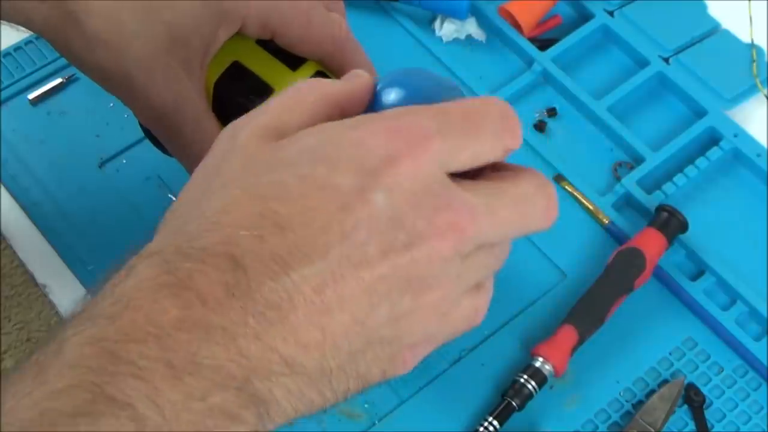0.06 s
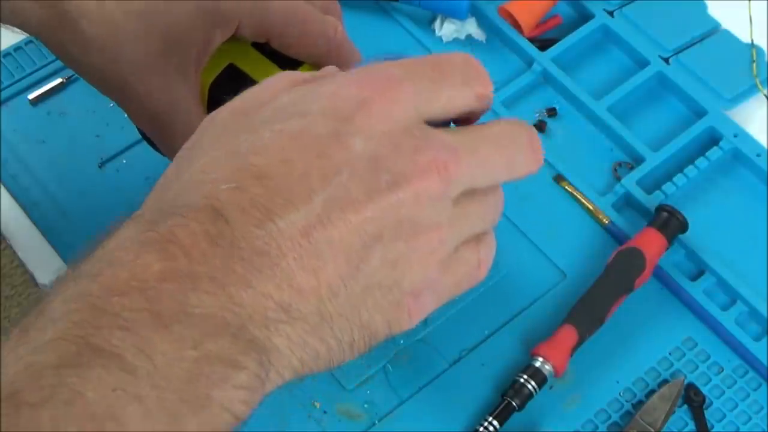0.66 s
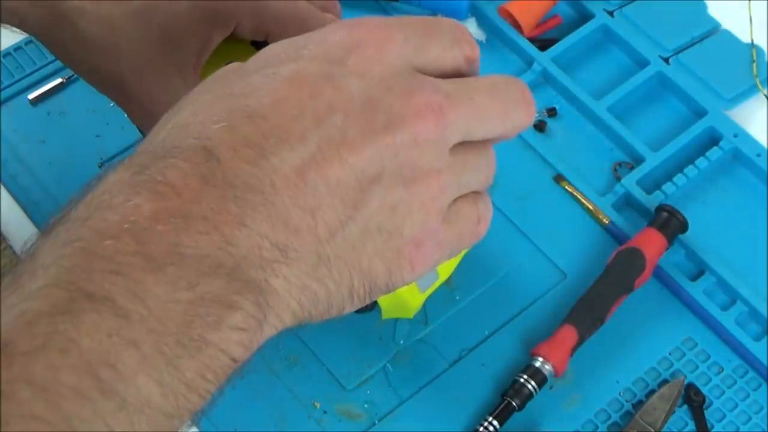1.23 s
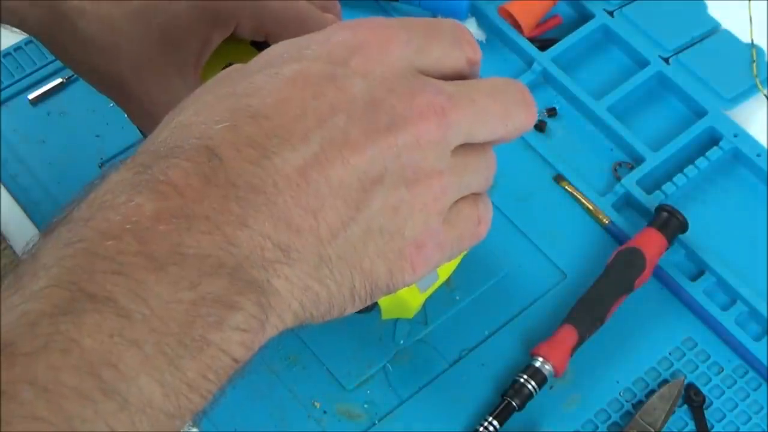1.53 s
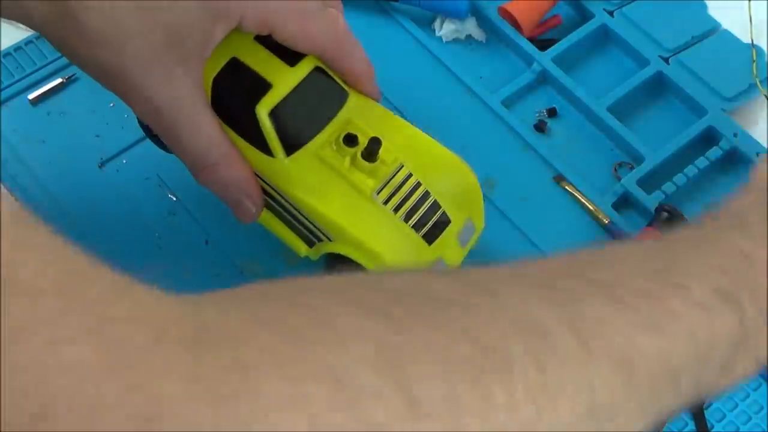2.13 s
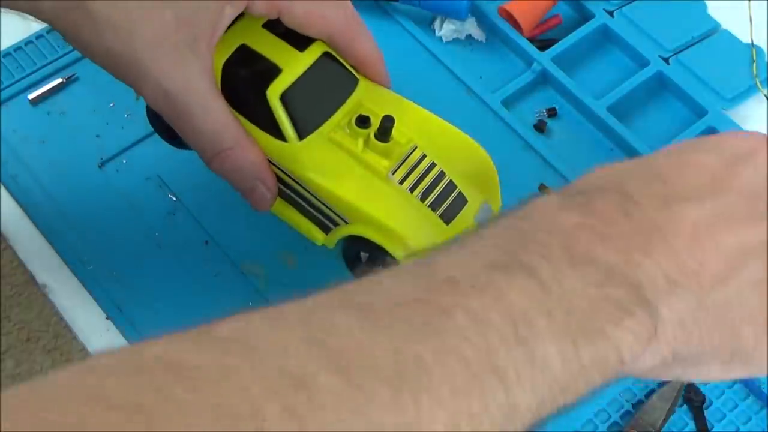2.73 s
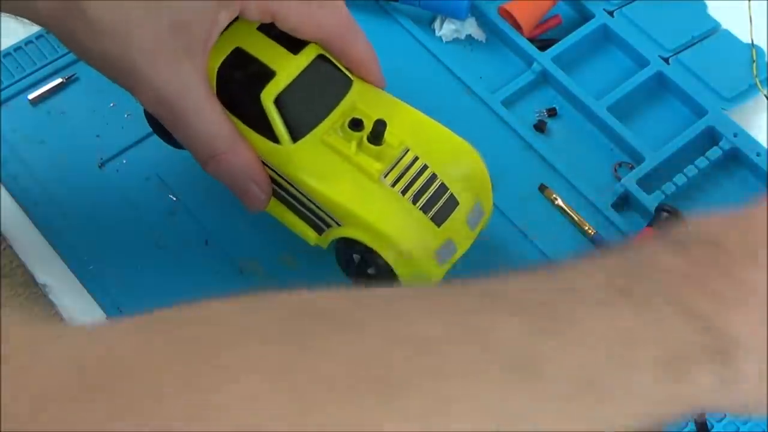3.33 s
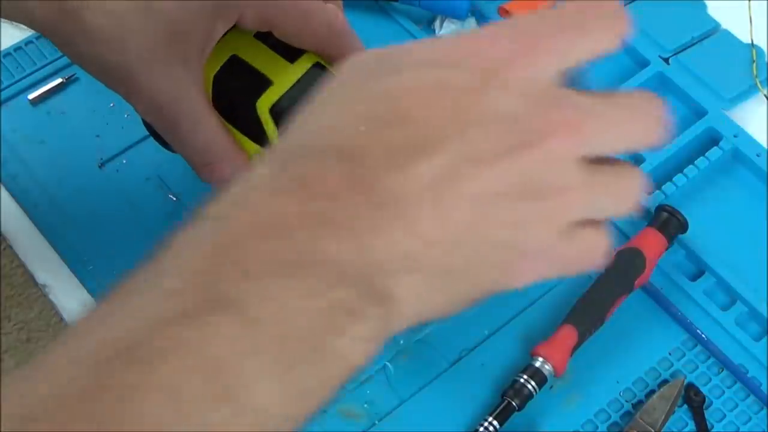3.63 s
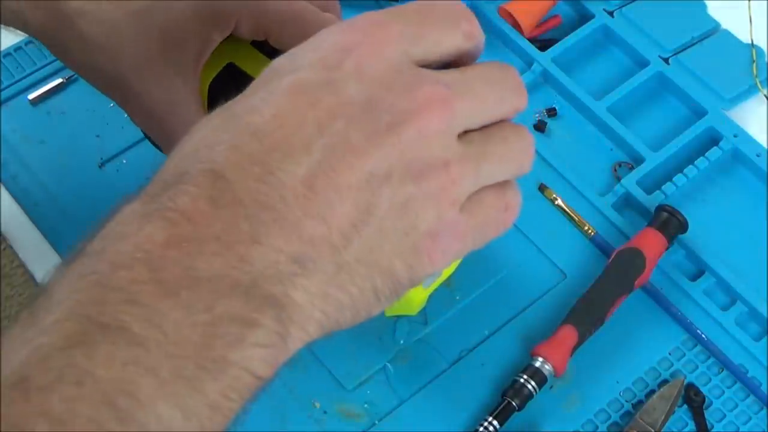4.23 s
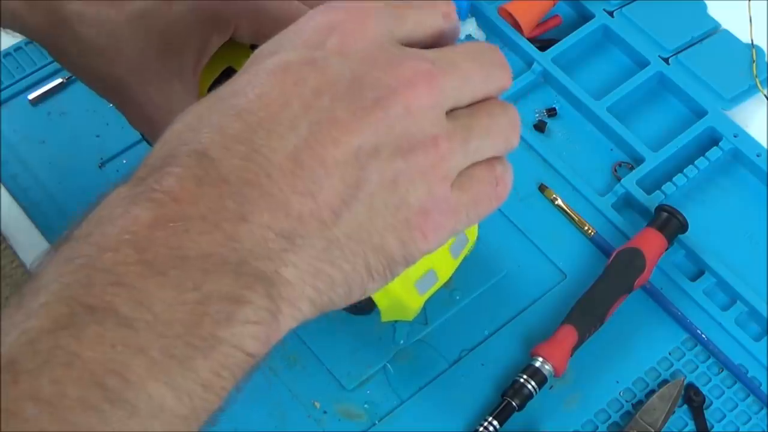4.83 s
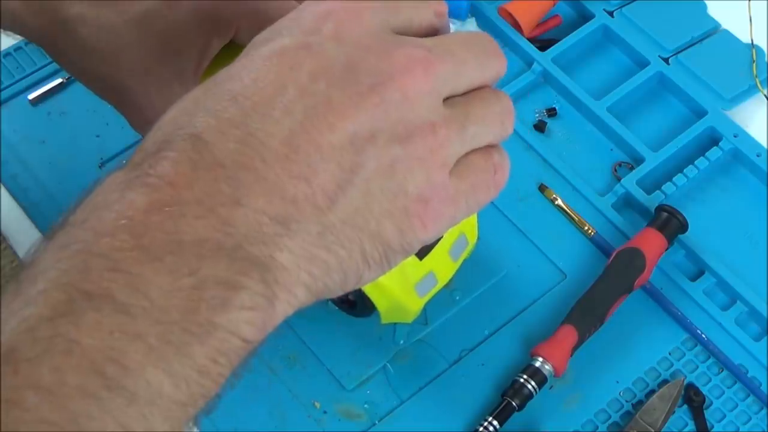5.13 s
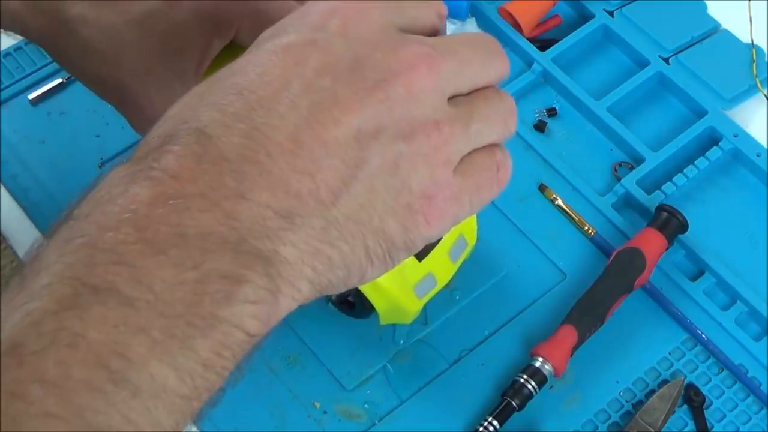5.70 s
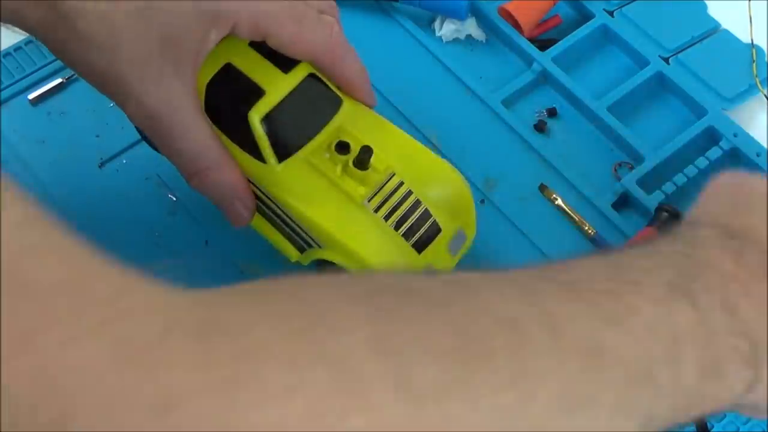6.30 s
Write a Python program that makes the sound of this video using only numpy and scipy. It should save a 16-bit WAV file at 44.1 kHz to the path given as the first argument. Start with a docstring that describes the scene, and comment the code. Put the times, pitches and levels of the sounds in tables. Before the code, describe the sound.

Plastic gears in a hand-held toy car rattle up to speed, wind down to single knocks, then whir again faster in a quiet room.

```python
"""Free-running gears of a toy car

A small motor spins the wheels of a hand-held toy car twice: the first run coasts down to single
knocks, the second stays at full speed. Loose plastic teeth knock on the hollow shell; at speed their
rebounds chatter sharply and set small metal parts ringing. Fingers tick on the shell and an arm
bumps the bench, over mains hum and the hiss of a quiet room."""
import sys
import numpy as np
from scipy import signal
from scipy.fft import rfft, irfft
from scipy.io import wavfile

SR = 44100
rng = np.random.default_rng(int(sys.argv[2]) if len(sys.argv) > 2 else 0)


def digitize_waveform(pressure):
    """Quantize a signal to 16-bit integers and store it at the path in sys.argv[1].

    Rows of a 2-D input are taken as channels; values are limited to [-1, 1].
    """
    field = np.atleast_2d(pressure).T
    bounded = np.clip(field, -1, 1)
    quanta = np.round(bounded * 32767).astype(np.int16)
    wavfile.write(sys.argv[1], SR, quanta)


N = 280472
TIME = np.arange(N) / SR
HZ = np.fft.rfftfreq(8192, 1 / SR)
RESPONSE_TIME = TIME[:len(HZ)]

# Meshing frequency of the gear teeth: t/s, f/Hz
SPEED = [(1.45, 34.3), (1.6, 117), (1.8, 283), (2.5, 327), (2.9, 295), (3.1, 150), (3.35, 140), (3.5, 61),
         (3.7, 34), (5.24, 50), (5.33, 171), (5.45, 360), (5.7, 534), (6.36, 490)]
TOOTH_HZ = np.interp(TIME, *np.transpose(SPEED))
PACE = TOOTH_HZ / TOOTH_HZ.max()  # fraction of top speed
# Spectra of the hollow shell, its thin panels, the tooth chatter and its treble fizz: f/Hz, level/dB
SHELL = [(60, -70), (180, -47), (280, -35), (370, -26.5), (465, -19), (520, -22), (600, -24), (680, -17.5),
         (780, -9.5), (900, -1.5), (1040, -2), (1185, -1), (1260, -11), (1500, -26), (2600, -55)]
PANELS = [(200, -70), (800, -30), (1240, -14), (1320, -2), (1430, -.5), (1525, -1), (1670, -8),
          (1900, -5.5), (2080, -8), (2280, -14.5), (3200, -38), (8000, -65)]
CHATTER = [(100, -61), (600, -14), (1500, -2.5), (2200, -5), (2700, -0.5), (3150, -0.5), (3500, -1),
           (4200, -1), (5200, -1.5), (6000, 0), (7500, -4), (8500, -2), (11000, -5), (16000, -24)]
FIZZ = [(500, -70), (6000, -20), (8000, -8), (8900, -1.5), (9800, -1), (10400, .5), (11000, -1.5),
        (11500, -8), (12800, -9), (13500, -13), (14300, -19), (15800, -21)]


def amp(db):
    """Amplitude ratio of a level."""
    return 10 ** (np.asarray(db) / 20)


def unit_rms(x):
    """Normalisation to a mean power of 1."""
    return x / np.sqrt(np.mean(x ** 2) + 1e-20)


def at_hz(rows, hz):
    """Interpolation on a logarithmic frequency axis."""
    f, value = np.transpose(rows)
    return np.interp(np.log(hz + 1), np.log(f + 1), value)


def curve(rows):
    """Linear interpolation in time."""
    return np.interp(TIME, *np.transpose(rows))


def add(mix, s, sound):
    """Superposition of a sound starting at s seconds."""
    part = mix[round(s * SR):][:len(sound)]
    part += sound[:len(part)]


def through(x, response):
    """Convolution, cut to the length of the input."""
    return signal.oaconvolve(x, response)[:len(x)]


def shaped(x, spectrum):
    """Zero-phase filtering by a spectrum in dB."""
    return irfft(rfft(x) * amp(at_hz(spectrum, np.fft.rfftfreq(N, 1 / SR))), N)


def steadied(x, seconds):
    """Division by the running rms evens out a click train but leaves its grain."""
    width = int(seconds * SR)
    power = signal.oaconvolve(x ** 2, np.hanning(width) / (width / 2), "same")
    return x / np.sqrt(abs(power) + 1e-7)


def gears():
    """Impact excitation: tooth knocks drive the shell, their rebounds the chatter, fizz and metal."""
    knock_db, chatter_db = run_levels()
    knocks = teeth(slop_periods=0.2, spread_db=4.5)
    flung = 0.69 * np.clip(PACE / 0.5, 0, 1)  # slow teeth slide, fast ones are flung across their play
    sliding = rebounds(knocks, settle_s=0.006, per_s=4000, spread_db=2, between=0.35)
    dull = flung * steadied(knocks, seconds=0.0072) + np.sqrt(1 - flung ** 2) * sliding
    sharp = rebounds(knocks * flung ** 2, settle_s=0.0062, per_s=10000, spread_db=4.5, between=0.034)
    chatter = amp(chatter_db + 1.5) * radiate(sharp, CHATTER)
    hard = sharp * axle_wander()  # the treble follows the pressure on the teeth most
    return shell_knock(dull, knock_db) + chatter + fizz(hard, chatter_db) + metal_parts(hard, chatter_db)


def run_levels():
    """Envelopes in dB of knock and chatter, with exponential decay outside the two runs."""
    # The run that coasts down and the run that holds its speed: t/s, knock level/dB, chatter level/dB
    coasting_run = [(1.46, -58.5, -79), (1.53, -36, -58), (1.63, -25.5, -38.5), (1.85, -23.5, -29),
                    (1.99, -30, -33.5), (2.05, -26.5, -29), (2.3, -25.5, -29.5), (2.82, -29.5, -32),
                    (3.18, -32, -40.5), (3.24, -30.5, -36), (3.28, -35.5, -47), (3.41, -33, -45),
                    (3.49, -39, -52), (3.59, -45, -58.5), (3.68, -57.5, -61.5)]
    steady_run = [(5.24, -58.5, -75), (5.326, -34, -50.5), (5.476, -25.5, -28.5), (6.344, -26, -27.5),
                  (6.36, -29, -29)]
    release_db_per_s = 250
    levels = []
    for rows in (coasting_run, steady_run):
        s, knock_db, chatter_db = np.transpose(rows)
        drop_db = release_db_per_s * abs(TIME - np.clip(TIME, s[0], s[-1]))
        levels.append([np.interp(TIME, s, db) - drop_db for db in (knock_db, chatter_db)])
    return np.max(levels, axis=0)


def teeth(slop_periods, spread_db):
    """Backlash: each tooth knocks once, early or late within its play and with uneven force."""
    teeth_passed = np.cumsum(TOOTH_HZ) / SR
    late, force = rng.standard_normal((4000, 2)).T
    onsets = np.searchsorted(teeth_passed, np.arange(len(late)) + slop_periods * late)
    return np.bincount(onsets, amp(spread_db * np.clip(force, -2, 1.6)), N + 1)[:N]


def rebounds(knocks, settle_s, per_s, spread_db, between):
    """Contact bounce: each knock breaks into a dying shower of contacts; weaker ones fall between."""
    shower = through(knocks, np.exp(-RESPONSE_TIME / settle_s))
    contacts = random_signs(rng.random(N) < per_s / SR)
    force = amp(spread_db * np.clip(rng.standard_normal(N), -2, 2))
    return steadied((shower + between) * contacts * force, seconds=0.094)


def axle_wander(depth_db=3.5, share_at_top_speed=0.38):
    """Amplitude modulation: the axle wanders and presses the teeth together; speed steadies it."""
    band = signal.butter(2, [18, 50], "band", fs=SR, output="sos")
    wander = unit_rms(signal.sosfilt(band, rng.standard_normal(N)))
    share = np.interp(PACE, [0, 1], [1, share_at_top_speed])
    return unit_rms(amp(depth_db * share * np.clip(wander, -2, 2)))


def random_signs(contacts):
    """Decorrelation: each part feels the same contacts with unrelated signs."""
    return contacts * rng.choice([-1, 1], N)


def body(spectrum):
    """Minimum-phase impulse response, energy 1, of a spectrum with the plastic's resonances added."""
    # Resonances of the plastic: f/Hz, bandwidth/Hz, lift/dB
    plastic = [(792, 25, 3), (940, 30, 2), (1008, 35, 3), (1140, 35, 3), (1175, 35, 4.5), (1320, 30, 4.5),
               (1505, 50, 2.5), (2024, 30, 4), (2530, 90, 3), (2718, 130, 4.5), (3000, 80, 2),
               (3560, 160, 2), (4650, 260, 3), (5765, 70, 4), (5925, 110, 4.5), (7086, 90, 5)]
    peaks_db = sum(lift / (1 + (2 * (HZ - hz) / width) ** 2) for hz, width, lift in plastic)
    db = at_hz(spectrum, HZ) + peaks_db
    log_gain = np.log(amp(np.r_[db, db[-2:0:-1]]))
    response = np.fft.ifft(np.exp(np.conj(signal.hilbert(log_gain)))).real[:len(HZ)]
    return response / np.linalg.norm(response)


def radiate(contacts, spectrum):
    """Source and filter: contacts sound through the response of a plastic part."""
    return through(random_signs(contacts), body(spectrum))


def shell_knock(contacts, knock_db):
    """Forced vibration of the hollow shell; its brighter panels gain with speed."""
    deep = amp(-1.2) * radiate(contacts, SHELL)
    bright = amp(-2 + 1.63 * np.log2(PACE)) * radiate(contacts, PANELS)
    return amp(knock_db) * (deep + bright)


def drive_gain(chatter_db, full_db, exponent, db_per_octave):
    """Power law in chatter amplitude and speed, giving full_db at full chatter and top speed."""
    full_chatter_db = -26
    return amp(full_db + exponent * (chatter_db - full_chatter_db) + db_per_octave * np.log2(PACE))


def fizz(contacts, chatter_db):
    """Contact time sets bandwidth: faster contacts are briefer and so brighter."""
    # Spectrum of the briefest contacts: f/Hz, level/dB
    sparkle = [(1000, -70), (9000, -20), (11300, -2), (12450, -1), (12780, 6), (13150, -5), (13650, -4),
               (13950, 0), (14300, -5), (15800, -8)]
    treble = radiate(contacts, FIZZ) + amp(-4.5) * PACE ** 2 * radiate(contacts, sparkle)
    return drive_gain(chatter_db, full_db=-23, exponent=2.97, db_per_octave=0) * treble


def metal_parts(contacts, chatter_db):
    """Resonance of loose metal parts, whose modes cross-fade at constant power with gear speed."""
    # Modes of the lower ring (taut, slack), the upper ring (ordinary, at top speed)
    # and the thin ring of the smallest parts: f/Hz, bandwidth/Hz, level/dB
    taut_modes = [(6652, 40, 0), (6610, 110, -3), (6470, 220, -9)]
    slack_modes = [(6620, 110, 0), (6420, 200, -1)]
    upper_modes = [(7840, 130, 0), (7780, 330, 0)]
    fast_modes = [(8072, 50, 0), (8030, 140, -5)]
    thin_modes = [(10250, 420, 0), (10500, 420, 0), (12780, 200, -7), (13930, 200, -11), (8870, 220, -6)]
    taut = np.clip((PACE - 0.2) / 0.2, 0, 1)
    lower = np.sqrt(taut) * ring(taut_modes, contacts)
    lower += amp(2) * np.sqrt(1 - taut) * ring(slack_modes, contacts)  # plus 2 dB: slack rings freely
    lower *= drive_gain(chatter_db, full_db=-26.5, exponent=1.05, db_per_octave=0.7)
    fast = np.clip((PACE - 0.55) / 0.8, 0, 1)
    upper = np.sqrt(fast) * ring(fast_modes, contacts) + np.sqrt(1 - fast) * ring(upper_modes, contacts)
    upper *= drive_gain(chatter_db, full_db=-22.5, exponent=2.4, db_per_octave=2.5)
    swell_db = 11.96 * np.exp(-((TIME - 2.502) / 0.31) ** 2)  # at the top of the first run
    thin = amp(swell_db) * ring(thin_modes, contacts)
    thin *= drive_gain(chatter_db, full_db=-35, exponent=1.1, db_per_octave=-1)
    return lower * seating() + upper * seating() + thin * seating()


def ring(modes, contacts):
    """Modal decay: each contact excites one damped mode, according to the spot it strikes."""
    t = RESPONSE_TIME
    drive = random_signs(contacts)
    spot = rng.integers(0, len(modes), N)
    responses = np.array([amp(db) * np.sqrt(width) * np.exp(-np.pi * width * t)
                          * np.sin(2 * np.pi * hz * t) for hz, width, db in modes])
    responses *= np.sqrt(len(modes)) / np.linalg.norm(responses)
    ringing = sum(through(drive * (spot == k), response) for k, response in enumerate(responses))
    bass_cut = signal.butter(2, 2500, "high", fs=SR, output="sos")  # small parts radiate no bass
    return signal.sosfilt(bass_cut, ringing)


def seating(cutoff_hz=10.2, depth_db=1.5):
    """Varying coupling: a loose part shifts in its seat and touches now firmly, now lightly."""
    drift = signal.sosfilt(signal.butter(2, cutoff_hz, fs=SR, output="sos"), rng.standard_normal(N))
    return unit_rms(amp(depth_db * np.clip(unit_rms(drift), -2, 1)))


def strike(spectrum, settle_s, scatter):
    """Transient response to one blow and its quick rebounds; rms 1 over the first 5 ms."""
    force = scatter * rng.standard_normal(len(HZ)) * np.exp(-RESPONSE_TIME / settle_s)
    force[0] += 1
    sound = through(force, body(spectrum))
    return sound / np.sqrt(np.mean(sound[:SR // 200] ** 2))


def jolts():
    """Hard impacts as the gears take up their backlash, each with a short, bright skid."""
    # Jumps of the gears in their play: t/s, level/dB, relative level of the skid/dB
    jumps = [(1.486, -41, -30), (1.519, -29, -10), (1.563, -21.5, -11.5), (1.588, -18.5, -8.5),
             (1.633, -24.5, 1), (1.74, -17.5, -3), (1.779, -9.5, -6.5), (1.834, -12, -14),
             (1.889, -13.5, -7), (2.111, -27, 8), (2.426, -27, 3), (2.675, -22.5, 5.5), (2.79, -21, -4),
             (2.873, -20, 2), (3.057, -23.5, 1), (3.242, -27, -3), (3.42, -23.5, -8), (3.524, -28.5, -8),
             (3.546, -38, -26), (3.571, -27, -15), (3.592, -28.5, -35), (5.265, -28, -11.5),
             (5.294, -31, -35), (5.312, -24, -17), (5.329, -23.5, -11), (5.389, -14, -12),
             (5.43, -9.5, -8.5), (5.44, -12, -12), (5.479, -24, -11), (5.501, -18, -28)]
    out = np.zeros(N)
    for s, db, skid_db in jumps:
        add(out, s, amp(db - 13) * strike(SHELL, settle_s=0.011, scatter=0.2))
        add(out, s, amp(db - 12) * strike(PANELS, settle_s=0.0054, scatter=0.067))
        add(out, s, amp(db + skid_db - 7.5) * strike(CHATTER, settle_s=0.0093, scatter=0.29))
        add(out, s, amp(db + skid_db - 10.5) * strike(FIZZ, settle_s=0.0023, scatter=0.94))
    return out


def stray_jolts(most_per_s=50):
    """A Poisson process of small impacts, more frequent and more prominent at low speed."""
    knock_db, chatter_db = run_levels()
    slowness = 1 - PACE
    force = amp(-2.5 + 3 * slowness + 2 * np.clip(rng.standard_normal(N), -2, 1))
    hits = (rng.random(N) < most_per_s * slowness / SR) * force
    knock = 0.5 * strike(SHELL, settle_s=0.003, scatter=0.1)
    skid = strike(CHATTER, settle_s=0.005, scatter=0.6) + 0.5 * strike(FIZZ, settle_s=0.005, scatter=0.9)
    return through(hits * amp(knock_db), knock) + through(hits * amp(chatter_db + 2.5), skid)


def handling():
    """Impact and friction: fingers tick and brush on the shell, an arm bumps the bench."""
    # Finger ticks and arm bumps: t/s, level/dB
    ticks = [(0.418, -36), (0.43, -36.5), (4.294, -49), (4.417, -44.5), (4.509, -42), (4.69, -42.5)]
    bumps = [(2.441, -39), (2.488, -38), (2.604, -42), (2.75, -37), (2.788, -45)]
    # Spectra of a finger tick, the bench and sliding skin: f/Hz, level/dB
    finger = [(100, -57), (600, -9), (1000, 7), (1900, 2.5), (2300, -4), (2750, -1), (3400, -15),
              (5000, -18), (12000, -30)]
    bench = [(30, -32), (80, -10), (120, -1), (210, -4), (300, -4), (600, -35)]
    skin = [(1000, -36), (3800, -3), (5100, 0), (6300, -17), (8000, 0), (10000, -5), (12500, -2),
            (15500, -20)]
    out = np.zeros(N)
    for s, db in ticks:
        add(out, s, amp(db - 8.5) * strike(finger, settle_s=0.0054, scatter=0.27))
    for s, db in bumps:
        bump = strike(bench, settle_s=0.035, scatter=0.36)
        add(out, s, amp(db - 6) * bump / abs(bump).max())
    brush_at_s, brush_length_s = 3.61, 0.11
    stroke = np.sin(np.pi * np.clip((TIME - brush_at_s) / brush_length_s, 0, 1))
    return out + amp(-55) * stroke * through(rng.standard_normal(N), body(skin))


def room(x, t60_scale):
    """Reverberation: sparse reflections of random sign decay at a rate that depends on frequency."""
    # Reverberation time before scaling: f/Hz, T60/s
    decay = [(200, 0.28), (1000, 0.05), (4000, 0.15), (14000, 0.12)]
    length, reflections_per_s = SR // 2, 4000
    taps = rng.choice([-1., 1.], length) * (rng.random(length) < reflections_per_s / SR)
    taps *= TIME[:length] > 0.001
    hz, t, spectra = signal.stft(taps, SR, nperseg=128)
    t60 = t60_scale * at_hz(decay, hz)[:, None]
    tail = signal.istft(spectra * amp(-60 * t / t60), SR, nperseg=128)[1]
    return through(x, tail / np.linalg.norm(tail))


def mains(whine_hz=15625, whine_db=-63):
    """A harmonic series on the mains frequency, with a faint pure tone of electronic whine."""
    # Partials of the hum: f/Hz, level/dB
    partials = [(50.1, -57.5), (100.2, -74.5), (150.3, -57.5), (250.5, -64), (350.7, -76.5), (450.9, -71.5)]
    # Slow rise and fall of the hum: t/s, gain/dB
    drift = [(0, 4.5), (1.7, 3.5), (2.0, -0.5), (2.5, -2.5), (3.0, 1.5), (5.4, 2.5), (5.7, -7), (6.36, -9)]
    hum = sum(amp(db) * np.sin(2 * np.pi * (hz * TIME + rng.random())) for hz, db in partials)
    return hum * amp(curve(drift)) + amp(whine_db) * np.sin(2 * np.pi * whine_hz * TIME)


def hiss():
    """Broadband Gaussian noise of a quiet room."""
    # Spectrum of the room noise: f/Hz, level/dB
    air = [(20, -30), (45, 4), (80, -9), (130, -10.5), (200, -10), (300, -8), (450, -11), (600, -12),
           (1100, -13), (2500, -17), (5000, -20), (10000, -22), (15400, -23.5)]
    # Envelope of the room noise: t/s, level/dB
    air_level = [(0, -54.5), (1.4, -55.5), (2.2, -52.5), (3.8, -56.5), (5.2, -56.5), (5.7, -58),
                 (6.36, -57.5)]
    return unit_rms(shaped(rng.standard_normal(N), air)) * amp(curve(air_level))


def scene():
    """Mid-side stereo: the car is close in front, and uncorrelated reflections widen it a little."""
    # Weighting of the left-right difference: f/Hz, gain/dB
    width = [(25, -46), (80, -25), (170, -10.5), (350, -13.5), (700, -7.5), (1400, -4), (2800, -8),
             (5600, -11.5), (10000, -15.5), (14000, -46)]
    car = gears() + jolts() + stray_jolts() + handling()
    mid = amp(0.6) * car + amp(-7.5) * room(car, t60_scale=1) + hiss() + mains()
    reflections = amp(-18.5) * room(car, t60_scale=0.034) + amp(1) * room(car, t60_scale=0.33)
    side = shaped(reflections + amp(5) * hiss(), width)
    return np.array([mid + side, mid - side])


def record(dry):
    """Band limiting by a steep linear-phase low-pass filter."""
    edge_hz = 15850
    low_pass = signal.firwin(801, edge_hz, window=("kaiser", 9), fs=SR)
    return signal.oaconvolve(dry, low_pass[None], "same", axes=1)


dry = scene()
out = record(dry)
digitize_waveform(out)
```